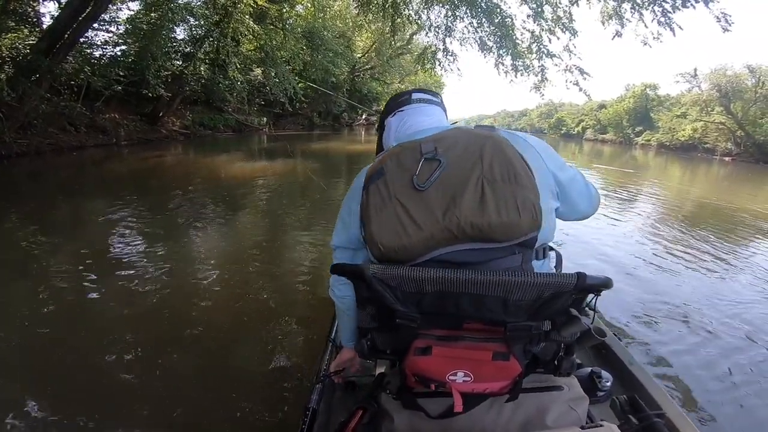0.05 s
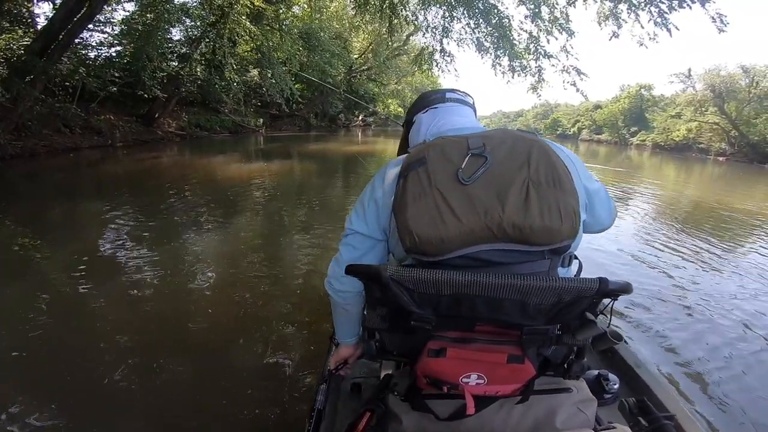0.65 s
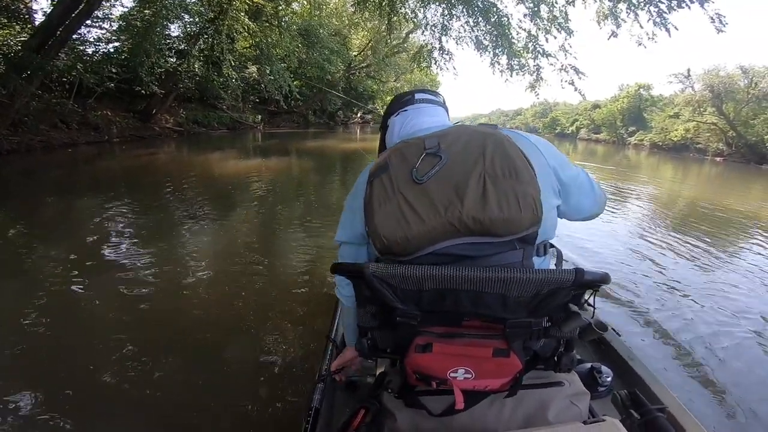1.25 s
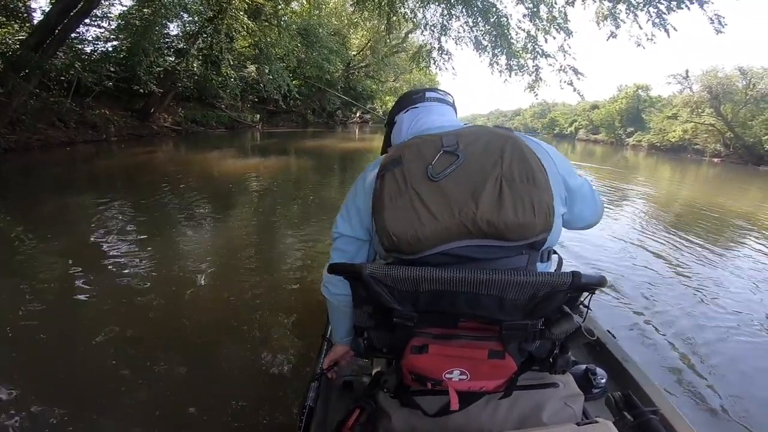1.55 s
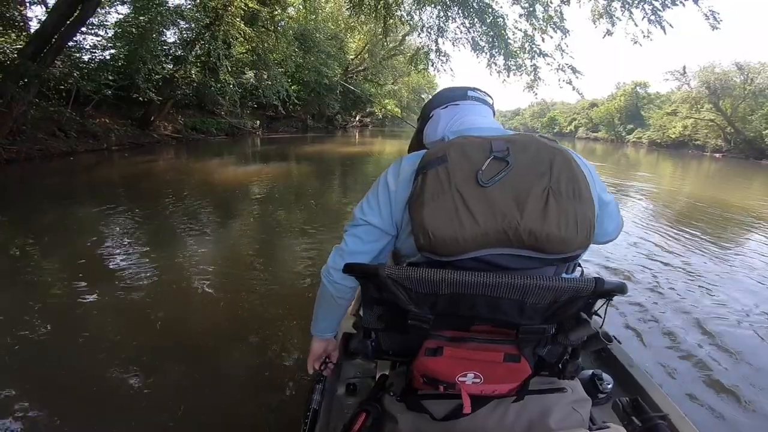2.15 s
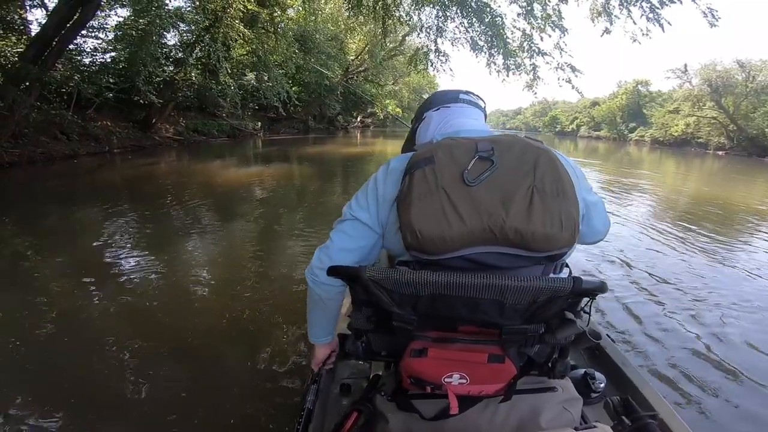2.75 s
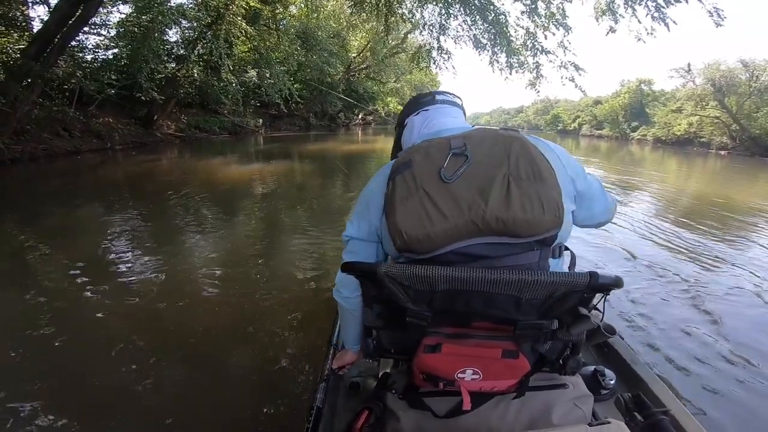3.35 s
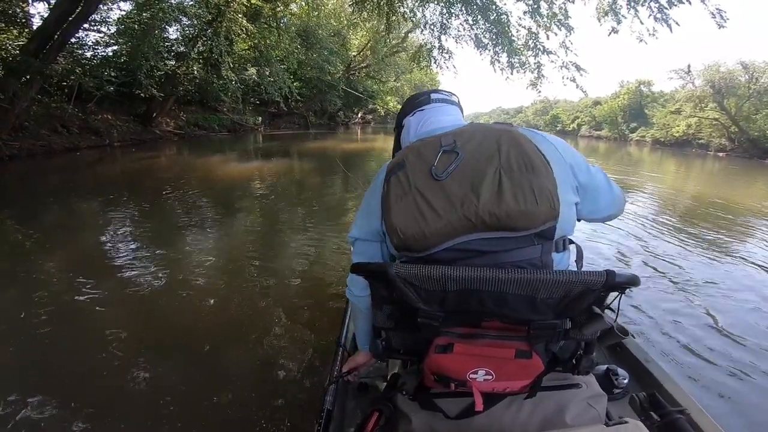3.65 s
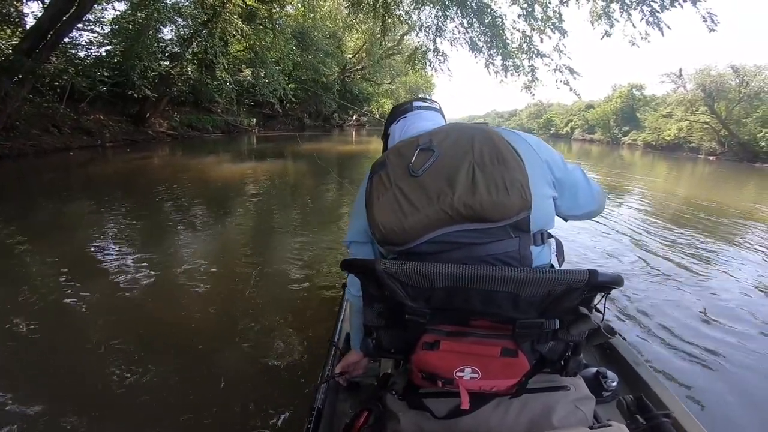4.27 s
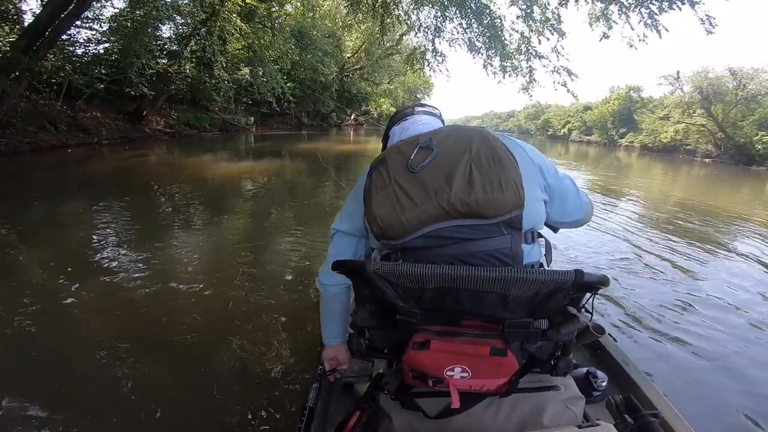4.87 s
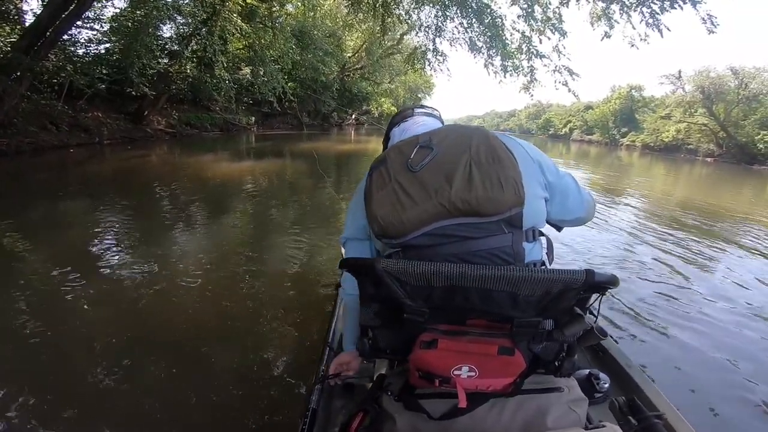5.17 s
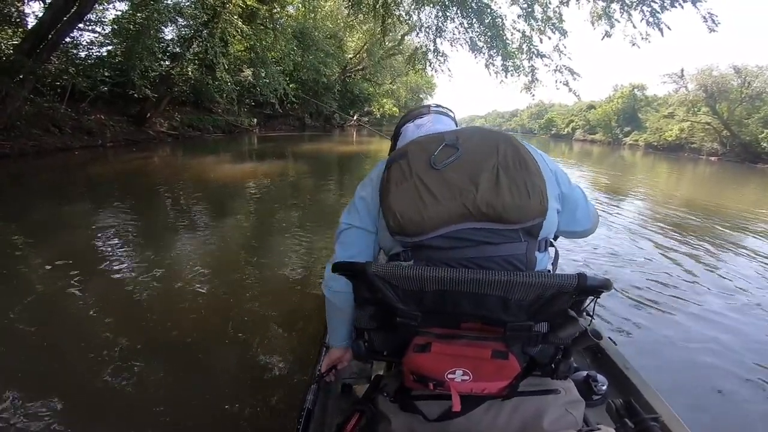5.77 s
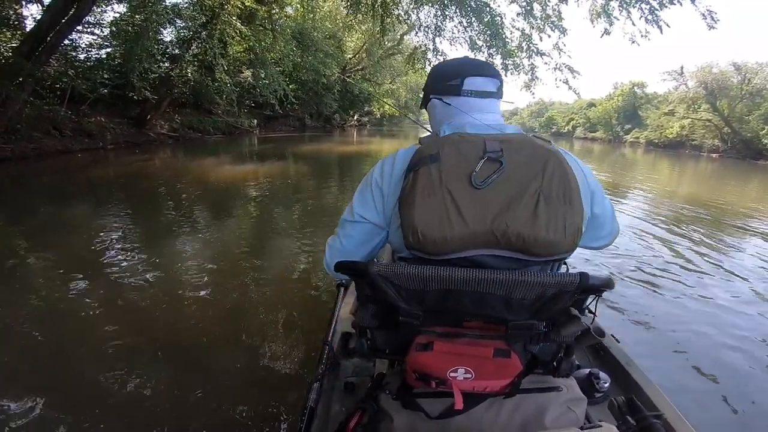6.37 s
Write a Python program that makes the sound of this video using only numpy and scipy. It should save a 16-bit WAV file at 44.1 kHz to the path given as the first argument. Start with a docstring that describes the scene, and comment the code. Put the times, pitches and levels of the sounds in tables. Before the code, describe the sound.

Gear bumps and slides around a plastic kayak in uneven thumps, clacks and rubs, while small birds chirp from the riverbank.

```python
"""A calm river, with the microphone at the stern of a drifting plastic kayak.
Close by, an angler shifts gear about: blows set the hollow hull thumping, sliding loads make it groan,
hard tackle clacks, ticks, squeaks and scrapes on the deck, and sleeves and bags rustle.
Farther off, small birds chirp and whistle from the wooded bank over a faint outdoor hush.
The stereo image is narrow at first and opens out after about four seconds."""
import sys
import numpy as np
from scipy import signal
from scipy.fft import rfft, irfft
from scipy.io import wavfile
from scipy.ndimage import uniform_filter1d

SR = 44100
rng = np.random.default_rng(int(sys.argv[2]) if len(sys.argv) > 2 else 0)


def pcm_store(signal):
    """Save signal as 16-bit PCM."""
    levels = np.round(np.clip(np.atleast_2d(signal), -1, 1) * 32767)
    wavfile.write(sys.argv[1], SR, levels.astype(np.int16).T)


N = 283122
TIME = np.arange(N) / SR


def from_db(db):
    """Decibels to gain."""
    return 10 ** (np.asarray(db) / 20)


def rms_one(x):
    """Scale to rms 1."""
    return x / np.sqrt(np.mean(x ** 2) + 1e-20)


def with_energy_of(sound, shape):
    """Scale a sound to the energy of an envelope."""
    return sound * np.sqrt(np.sum(shape ** 2) / (np.sum(sound ** 2) + 1e-20))


def add(track, s, sound):
    """Mix a sound into a track from time s on."""
    start = max(int(s * SR), 0)
    track[start:start + len(sound)] += sound[:N - start]


def band(x, low_hz, high_hz, order):
    """Butterworth band-pass."""
    return signal.sosfilt(signal.butter(order, [low_hz, high_hz], "band", fs=SR, output="sos"), x)


def noise(colour):
    """Steady noise, rms 1, with a spectrum of (frequency [Hz], level [dB]) points."""
    hz, db = np.transpose(colour)
    bins = np.fft.rfftfreq(N, 1 / SR) + 1
    gain = from_db(np.interp(np.log(bins), np.log(hz), db))
    return rms_one(irfft(rfft(rng.standard_normal(N)) * gain, N))


def drift(rate_hz):
    """Random wander with a spread of about 1."""
    return np.interp(TIME * rate_hz, np.arange(N), rng.standard_normal(N))


def swell(t, rise, t60):
    """An envelope that builds up to 1, then dies away."""
    shape = (1 - np.exp(-t / rise)) * from_db(-60 * t / t60)
    return shape / shape.max()


def scatter(x, t60, low_hz, high_hz, rise=0.0053):
    """Diffuse reflections within a band, at unit gain."""
    t = np.arange(SR) / SR
    response = band(rng.standard_normal(SR) * swell(t, rise, t60), low_hz, high_hz, order=2)
    band_share = (high_hz - low_hz) / (SR / 2)
    response *= np.sqrt(band_share / np.sum(response ** 2))
    return signal.fftconvolve(x, response)[:N]


def glides(notes, waver):
    """Thin gliding notes with a fast, rough waver."""
    out = np.zeros(N)
    wobble = 1 + waver * drift(600)
    for s, length, start_hz, end_hz, db in notes:
        along = np.linspace(0, 1, int(length * SR))
        hz = (start_hz + (end_hz - start_hz) * along) * wobble[int(s * SR):][:len(along)]
        add(out, s, from_db(db) * np.sin(np.pi * along) * np.sin(2 * np.pi * np.cumsum(hz) / SR))
    return out


# Open air all round the microphone: (time [s], level [dB])
HUSH_LEVELS = [(0, -48), (1.0, -50), (1.8, -51), (3.5, -54), (3.8, -47.5), (4.2, -56.5), (5.05, -59.5),
               (5.3, -55), (6.42, -55.5)]
# Its spectrum: (frequency [Hz], relative level [dB])
HUSH_COLOUR = [(20, -34), (50, -12), (90, -28), (150, 13.5), (230, 9.5), (420, 5.5), (750, 2.5),
               (1200, -1.5), (2100, -9), (3600, -15.5), (4700, -21), (5600, -31), (6800, -38), (8800, -37),
               (11000, -54)]


def hush():
    """Faint, low outdoor noise that rises and sinks over the river."""
    return from_db(np.interp(TIME, *np.transpose(HUSH_LEVELS))) * noise(HUSH_COLOUR)


# Small birds across the water: (time [s], length [s], middle pitch [Hz], relative level [dB])
BANK_CHIRPS = [(0.039, 0.083, 4270, -42), (0.128, 0.14, 3644, -43.5), (0.272, .098, 4500, -56.5),
               (0.378, 0.05, 3550, -44), (0.531, 0.041, 3634, -42.5), (0.634, 0.092, 5360, -60.5),
               (0.687, 0.072, 4390, -49), (0.996, .037, 5660, -50.5), (2.24, 0.032, 5070, -56),
               (2.467, 0.032, 5000, -59), (2.742, .16, 3174, -55.5), (3.628, 0.037, 7750, -68),
               (4.585, 0.037, 6170, -69.5), (4.875, 0.039, 3526, -62), (5.087, 0.042, 3420, -53.5),
               (5.136, 0.034, 3910, -51.5), (5.185, 0.017, 7300, -57), (5.465, 0.081, 5430, -55),
               (5.504, 0.091, 4720, -57.5), (5.976, 0.087, 7420, -65.5), (6.229, 0.031, 6050, -59.5)]


def bird_chirps(fall=0.055):
    """Short notes, each falling by a share of its pitch, arrive mostly by way of the leaves."""
    notes = [(s, length, hz * (1 + fall / 2), hz * (1 - fall / 2), db)
             for s, length, hz, db in BANK_CHIRPS]
    song = glides(notes, waver=0.06)
    return from_db(-4) * song + from_db(-3) * scatter(song, t60=0.38, low_hz=2530, high_hz=9000)


# Resonances of deck and tackle, near the microphone: (frequency [Hz], bandwidth [Hz], gain [dB])
DECK_MODES = [(1035, 130, -9.5), (1406, 360, -2), (1622, 19, -5.5), (1995, 81, -2.5), (2230, 59, 0),
              (2580, 360, 2.5), (3120, 33, -3.5), (3340, 580, -2), (3950, 350, -4), (4370, 89, 0.5),
              (4710, 58, 9)]


def through_deck(x):
    """A contact is heard partly direct, mostly through the deck's resonances."""
    out = 0.42 * x
    for hz, width, db in DECK_MODES:
        radius = np.exp(-np.pi * width / SR)
        feed = (1 - radius ** 2) / 2 * np.array([1, 0, -1])
        feedback = [1, -2 * radius * np.cos(2 * np.pi * hz / SR), radius ** 2]
        out += from_db(db) * signal.lfilter(feed, feedback, x)
    return out


def contact(low_db, middle_db, high_db, t60):
    """One hard touch rings the crowded, short-lived upper modes of plastic and tackle in three bands."""
    t = np.arange(SR // 8) / SR
    shape = swell(t, rise=t60 / 32, t60=t60)
    burst = through_deck(rng.standard_normal(2 * len(t)))[len(t):] * shape
    bands = (1000, 2400, low_db), (2100, 4060, middle_db), (4670, 8800, high_db)
    return sum(from_db(db) * with_energy_of(band(burst, low_hz, high_hz, order=4), shape)
               for low_hz, high_hz, db in bands)


# Tackle landing on the deck, close by:
# (time [s], level [dB], brightness [dB], snap [dB], pitch of the piece [Hz])
TACKLE_HITS = [(.05,-28,-2,-30,2250), (.406,-39,-3,-26.5,1360), (.475,-39.5,1,-16,3470),
               (.484,-30.5,-3,-27,1530), (.832,-40.5,-6,-29,2150), (0.907,-48,-8,-26,1030),
               (0.95,-27.5,-5,-30,3810), (1.011,-44,-14,-25,1380), (1.039,-36.5,-15,-35,1970),
               (1.066,-37,1.5,-25,1590), (1.109,-29,-2,-34,2350), (1.151,-32,-1,-35,1520),
               (1.468,-46,14.5,-24,3390), (1.585,-41.5,2,-24,3410), (1.598,-31.5,-4,-31,1560),
               (1.711,-42,-7,-33,2160), (1.726,-41,12.5,-41,3660), (1.882,-46,14.5,-20,3330),
               (1.94,-47,11,-30,2950), (2.055,-33.5,-2.5,-31,1113), (2.419,-38.5,-2,-45,1120),
               (2.431,-37,-4,-29.5,2037), (2.689,-37,-8.5,-44,1119), (2.71,-43.5,-13,-37,1380),
               (2.992,-33.5,3,-34,2150), (3.086,-53.5,-8,-31,1160), (3.235,-48,0,-18.5,4020),
               (3.592,-42,-1.5,-40,1432), (3.657,-44,-7,-30,1350), (3.743,-42.5,-7.5,-35,1370),
               (3.82,-39.5,4,-31,3390), (3.828,-27.5,3,-17.5,2110), (3.955,-33,-1.5,-35,1290),
               (4.478,-50,14,-38,2630), (4.608,-48,-12.5,-18.5,970), (5.051,-53,2,-14,4080),
               (5.164,-43.5,3,-21,1980), (5.482,-48.5,11,-21,2600), (5.542,-52.5,-18,-21,1390),
               (5.749,-42.5,6.5,-9,1228), (6.002,-37.5,-3.5,-26,1250), (6.057,-48.5,9,-8,2170),
               (6.085,-37.5,3,-11,3730)]


def tackle_clacks():
    """Loose tackle grazes the deck, lands, and chatters with one lighter touch."""
    out = np.zeros(N)
    graze, landing, chatter = (-0.005, -15), (0, 0), (0.0078, -12)   # (delay [s], gain [dB])
    for s, db, brightness, snap, _ in TACKLE_HITS:
        for delay, gain_db in (graze, landing, chatter):
            touch = contact(db - brightness / 2, db + brightness / 2, db + snap, t60=0.025)
            add(out, s + delay, from_db(gain_db) * touch)
    return out


def tackle_rings():
    """Each piece of tackle also sounds its own brief note as it lands."""
    return rings([(s, hz, db + 2, 0.045) for s, db, _, _, hz in TACKLE_HITS])


def rings(notes, rise_cycles=0.95):
    """Struck parts ring at one pitch each, building up within a cycle or so."""
    out, t = np.zeros(N), np.arange(SR // 4) / SR
    for s, hz, db, t60 in notes:
        add(out, s, from_db(db) * np.sin(2 * np.pi * hz * t) * swell(t, rise_cycles / hz, t60))
    return out


# Modes of the hull under the microphone: (frequency [Hz], strength [dB], t60 before extra damping [s])
HULL_MODES = [(77, -20.5, 0.31), (90.6, -2.5, 0.31), (101, -4.5, 0.099), (113.9, -4.5, 0.44),
              (136.6, 6.5, 0.25), (149, -4.5, 0.1), (166.9, 1, 0.17), (185.3, 5, 0.14), (209.1, -0.5, 0.21),
              (231, -4, 0.15), (271.7, -2, 0.15), (309, 0.5, 0.08), (316.4, 4.5, 0.14), (334.3, -2.5, 0.1),
              (365, 4, 0.17), (394.7, 1, 0.16), (428.8, 0.5, 0.2), (472, -4.5, 0.24), (522.5, -3, 0.12),
              (561, 7.5, 0.051), (613, 2.5, 0.13), (665.7, 3, 0.1), (735, 2, 0.087), (756, -6.5, 0.026),
              (802, -3.5, 0.11), (858, -4.5, 0.079), (920, -9, 0.024), (955, -2, 0.053),
              (1146, -6.5, 0.075), (1186, -10.5, 0.08), (1293, -5, 0.052), (1410, -11, 0.02)]


def hull_register(t, low_hz, high_hz, rise, energy_t60, damping):
    """The hull modes of one register; each place struck reaches them with other strengths and phases."""
    hz, db, t60 = np.transpose([mode for mode in HULL_MODES if low_hz <= mode[0] < high_hz])[:, :, None]
    strength, phase = rng.random((2, len(hz), 1))
    decay = from_db(db - 60 * damping * t / t60)
    modes = (0.5 + strength) * decay * np.sin(2 * np.pi * (hz * t + phase))
    onset = 1 - np.exp(-t / rise)
    return with_energy_of(modes.sum(axis=0) * onset, swell(t, rise, energy_t60))


def struck_hull(blows):
    """An edge raps the hull; as the weight follows, the panel flexes and sets the whole hull moving."""
    out, t = np.zeros(N), np.arange(SR // 3) / SR
    for s, db, panel_hz, hardness_db, boom_db, lag in blows:
        panel = -np.sin(2 * np.pi * panel_hz * t) * swell(t, rise=0.003, t60=0.11)
        boom = hull_register(t, 55, 145, rise=0.002, energy_t60=0.035, damping=1.41)
        body = hull_register(t, 145, 280, rise=0.015, energy_t60=0.065, damping=1.27)
        knock = hull_register(t, 280, 550, rise=0.00048, energy_t60=0.05, damping=1.15)
        rap = hull_register(t, 550, 1600, rise=0.0006, energy_t60=0.035, damping=1.0)
        # harder blows are brighter
        edge = from_db(0.43 * hardness_db - 2) * knock + from_db(hardness_db - 9.5) * rap
        weight = from_db(boom_db) * boom + 0.92 * panel + 0.56 * body
        add(out, s, from_db(db) * edge)
        add(out, s + lag, from_db(db) * weight)
    return band(out, 78, 1800, order=3)


# Gear striking the hull, close by:
# (time [s], level [dB], panel pitch [Hz], hardness [dB], boom [dB], lag of weight behind edge [s])
HULL_BLOWS = [(.051,-24.5,195,9,-11,0.0081), (.147,-31,178,3.5,-18,0.0011), (0.392,-18,196,6.5,2.5,0),
              (.466,-22.5,151,-4,-7.5,0.0015), (.491,-20,227,5,-4,0), (0.643,-31,176,-24.5,-13.5,0),
              (.691,-36,201,2,-7,0.0078), (.785,-29.5,203,8,-6.5,0), (.886,-22,156.5,1.5,-16.5,0),
              (0.91,-23.5,165,7,1,0.00063), (.949,-22,190,2.5,2,0.00051), (0.986,-13.5,176,-5,-6.5,0.014),
              (1.04,-23.5,205,10,-15,0.0043), (1.109,-23.5,190,11.5,-11,0), (1.194,-37,206,16,-20,0.0017),
              (1.468,-19,168,-3.5,-3,0), (1.511,-21,219,-10.5,-2,0.0062), (1.605,-13.5,195.3,2,-3.5,0.0034),
              (1.725,-26,165.4,11,1.5,0.0004), (1.937,-30,196,-7,-13,0.0009), (1.99,-31,152,-1,-5,0.0028),
              (2.021,-23,147,-6.5,-0.5,0.006), (2.051,-16.5,149.7,0,1.5,0.0024),
              (2.352,-18,149.4,-15.5,-15.5,0), (2.385,-21,147.3,-8,2,0.0057), (2.421,-17.5,205,1,-8,.008),
              (2.447,-17.5,212.3,1,-5,0.0082), (2.649,-18,183,-15,-17,0.0007),
              (2.69,-17.5,159,2.5,-16.5,0.00036), (2.707,-15,165.7,2.5,-4.5,0.00079),
              (2.996,-26,216,-3.5,-9.5,0), (3.084,-22,218,0.5,-8.5,0), (3.153,-31,185,-11,5.5,0.024),
              (3.223,-22.5,195,-8,-9,0.0032), (3.237,-12.5,196,-3.5,-3,0.0031),
              (3.48,-29.5,193,-10.5,-14,0.00074), (3.567,-19.5,205.8,-5,-13,0.0022),
              (3.595,-19.5,192.4,2,-10,0), (3.659,-22,191.4,1.5,-6,0.0031), (3.748,-22,191.3,1.5,-5.5,0),
              (3.833,-21,218,4.5,-5.5,0.01), (3.907,-25.5,168,-4,-8.5,0.00074),
              (3.959,-18.5,153.5,2,-6,0.0024), (4.61,-12.5,192,-3,-6.5,0.0051),
              (5.162,-41,189,11.5,-20,0.0009), (5.214,-29,218.6,-11,-6.5,0.00095),
              (5.482,-34.5,200,9.5,-16,0.02), (5.544,-32,209,-14,-4,0.00056),
              (5.749,-23.5,142.8,13.5,-3.5,0), (5.801,-32.5,271,16.5,-9.5,0), (5.83,-27.5,149,13.5,-1,0),
              (5.947,-19,177,-14.5,-6,0), (5.976,-18.5,203,-12.5,-1.5,0.003),
              (6.032,-18.5,159,-15,-1,0.0026), (6.087,-24.5,171,6.5,2,0.0017)]


def hull_knocks(settle_s=0.036, boom_db=-6):
    """Gear thumps the hull, then settles with one softer, duller bump."""
    bumps = [(s + settle_s * rng.uniform(0.8, 1.2), db - 10, hz, hardness_db - 15, boom_db, 0)
             for s, db, hz, hardness_db, _, _ in HULL_BLOWS]
    return struck_hull(HULL_BLOWS + bumps)


# Hollow fittings on the boat: (time [s], pitch [Hz], level [dB], t60 [s])
FITTING_NOTES = [(.147, 537, -30.5, 0.12), (.491, 748, -25.5, 0.044), (1.607, 346, -11.5, 0.049),
                 (1.725, 523, -25, 0.086), (2.431, 441, -20.5, 0.18), (2.708, 753, -21.5, 0.034),
                 (2.994, 660, -19.5, .06), (2.997, 388, -15.5, 0.034), (3.239, 416, -33.5, .12),
                 (4.618, 343, -21.5, 0.13)]


def fitting_tocks():
    """A hollow fitting sounds a short, low note when hit."""
    return rings(FITTING_NOTES)


# Birds far off on the bank: (time [s], length [s], pitch [Hz], level [dB])
FAR_WHISTLES = [(0.24, 0.39, 5880, -66.5), (3.191, 0.17, 2590, -59), (3.503, 0.16, 2616, -60),
                (3.845, 0.23, 2570, -59)]


def bird_whistles():
    """Soft, thin notes, each wavering slightly about one pitch."""
    out, wander = np.zeros(N), 1 + 0.014 * drift(300)
    for s, length, hz, db in FAR_WHISTLES:
        gate = signal.windows.tukey(int(length * SR), 0.5)
        pitch = hz * wander[int(s * SR):][:len(gate)]
        add(out, s, from_db(db) * gate * np.sin(2 * np.pi * np.cumsum(pitch) / SR))
    return out


# Squeaks on the boat, close by: (time [s], length [s], start pitch [Hz], end pitch [Hz], level [dB])
SLIDE_SQUEAKS = [(.456, 0.04, 4880, 5150, -37.5), (1.574, 0.026, 5140, 4970, -40)]


def plastic_squeaks():
    """Plastic squeaks as a slide sets in."""
    return glides(SLIDE_SQUEAKS, waver=0.05)


def rubbing(strokes, colour, sag_db_per_s, grit_db, slips_per_s, attack_s=0.0049, release_t60=0.039):
    """Each stroke sets in, loses pressure and lets go; it sticks and slips in grains that ring the deck."""
    pressure, t = np.zeros(N), np.arange(SR) / SR
    for s, length, db in strokes:
        attack = np.minimum(t / attack_s, 1)
        release_db = 60 * np.maximum(t - length, 0) / release_t60
        add(pressure, s, attack * from_db(db - sag_db_per_s * t - release_db))
    grains = noise(colour) * from_db(grit_db * drift(slips_per_s))
    return pressure * rms_one(through_deck(grains))


SLIDE_SAG_DB_PER_S = 40.5
# Gear sliding over the hull, close by: (time [s], length [s], relative level [dB])
GEAR_SLIDES = [(.47, 0.06, -36), (.745, 0.068, -29.5), (0.886, .12, -31), (1.02, 0.17, -24.5),
               (1.5, 0.062, -32.5), (2.361, 0.16, -34), (2.715, 0.084, -26), (3.553, 0.44, -35.5),
               (5.223, .07, -42), (5.511, 0.058, -37), (5.754, 0.094, -25), (5.867, 0.23, -22.5)]
# The groan as heard at the stern: (frequency [Hz], relative level [dB])
GROAN_SPECTRUM = [(45, -25), (90, -7), (150, -3.5), (210, 8), (270, -2), (380, -1), (520, -6.5), (750, -26),
                  (1300, -36.5), (2600, -70.5)]


def hull_groans():
    """The hollow hull groans while gear slides over it."""
    return rubbing(GEAR_SLIDES, GROAN_SPECTRUM, SLIDE_SAG_DB_PER_S, grit_db=-2.5, slips_per_s=90)


def hull_jolts(jolts_per_s=33, panel_hz=186.3, hardness_db=5.5, boom_db=-6):
    """Sliding gear jolts the hull unevenly, more weakly as the slide loses pressure."""
    jolts = []
    for s, length, db in GEAR_SLIDES:
        for count, (jitter, size, detune) in enumerate(rng.uniform(-1, 1, (20, 3)), start=1):
            after = (count + jitter / 3) / jolts_per_s
            if after < length:
                jolt_db = db - 1.5 - SLIDE_SAG_DB_PER_S * after + 3.5 * size
                jolts.append((s + after, jolt_db, panel_hz * 2 ** (detune / 4), hardness_db, boom_db, 0))
    return struck_hull(jolts)


# Tackle dragged along the deck, close by: (time [s], length [s], relative level [dB])
TACKLE_DRAGS = [(.472, 0.11, -25), (.97, .09, -33), (1.075, 0.098, -27), (1.585, .11, -28),
                (5.748, 0.1, -35), (5.95, .16, -44.5)]
# The friction before the deck colours it: (frequency [Hz], relative level [dB])
SCRAPE_SPECTRUM = [(350, -2.5), (600, -4), (900, 6), (1200, -18.5), (1700, -2.5), (2300, -18.5),
                   (3800, -18.5), (5200, -35), (6300, -45.5), (8800, -47.5), (11000, -78)]


def tackle_scrapes():
    """Hard tackle catches and slips quickly on the plastic."""
    return rubbing(TACKLE_DRAGS, SCRAPE_SPECTRUM, sag_db_per_s=107.5, grit_db=4.5, slips_per_s=360)


# Cloth moving at the angler's seat: (time [s], length [s], relative level [dB])
CLOTH_BRUSHES = [(.765, 0.047, -49.5), (1.695, 0.15, -48.5), (1.86, 0.12, -47.5), (5.235, 0.046, -49.5)]
# The brushing before the deck colours it: (frequency [Hz], relative level [dB])
CLOTH_SPECTRUM = [(500, -15), (1000, 1), (2500, 4.5), (4000, -6), (5500, -5), (6500, -24), (8500, -19),
                  (11000, -44)]


def cloth_rustles():
    """Sleeves and bags brush in short, grainy strokes."""
    return rubbing(CLOTH_BRUSHES, CLOTH_SPECTRUM, sag_db_per_s=93.5, grit_db=5.5, slips_per_s=230)


# Tackle ticking near the microphone: (time [s], level [dB])
DRY_TICKS = [(2.155, -30), (2.204, -38), (2.245, -36), (2.287, -29.5), (2.325, -30)]


def tackle_ticks():
    """A short run of dry contacts, like a ratchet turning."""
    out = np.zeros(N)
    for s, db in DRY_TICKS:
        add(out, s, contact(db - 41, db, db - 42, t60=0.013))
    return out


# Stereo width at the stern, narrow and then open: (time [s], side gain [dB])
STEREO_WIDTH = [(0, -43.5), (3.7, -69), (3.85, -21), (4.3, -15), (4.6, -4), (6.42, -3)]


def spread(mid):
    """The left side leads in phase, the treble leans to the right, and the deck scatters a little."""
    lead = -signal.hilbert(mid).imag
    treble = mid - uniform_filter1d(mid, size=25)
    reflections = scatter(mid, t60=0.02, low_hz=300, high_hz=11000, rise=0.0003)
    side = from_db(-4.5) * lead - from_db(-5.5) * treble + from_db(-17.5) * reflections
    side *= from_db(np.interp(TIME, *np.transpose(STEREO_WIDTH)))
    return np.array([mid + side, mid - side])


def scene():
    """Boat and gear close to the microphone, birds and hush beyond, spread over two channels."""
    boat = tackle_rings() + hull_knocks() + fitting_tocks() + hull_jolts()
    boat += from_db(-3.5) * hull_groans()
    gear = tackle_clacks() + plastic_squeaks() + tackle_ticks()
    gear += from_db(-6) * tackle_scrapes() + from_db(-2) * cloth_rustles()
    # water and bank send back a weak tail
    echo = from_db(-11.5) * scatter(gear, t60=0.16, low_hz=860, high_hz=6000)
    echo += from_db(-32.5) * scatter(boat, t60=0.51, low_hz=131, high_hz=1500)
    beyond = hush() + bird_chirps() + bird_whistles()
    return spread(boat + gear + echo + beyond)


def record(dry):
    """A steep low-pass cuts the top, 70 dB down from 13.5 kHz on."""
    return signal.sosfilt(signal.cheby2(12, 70, 13500, fs=SR, output="sos"), dry)


dry = scene()
out = record(dry)
pcm_store(out)
```